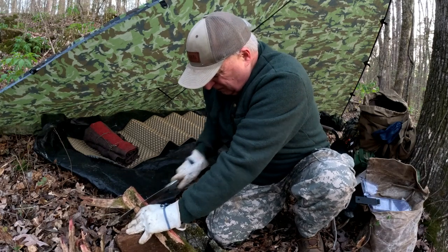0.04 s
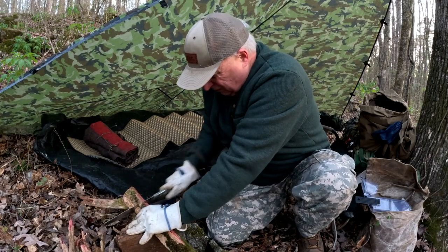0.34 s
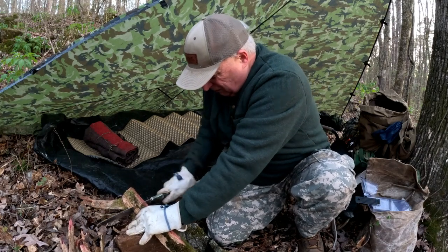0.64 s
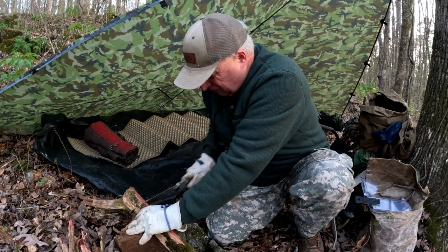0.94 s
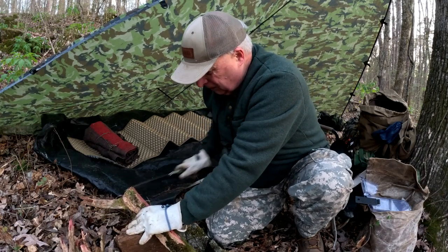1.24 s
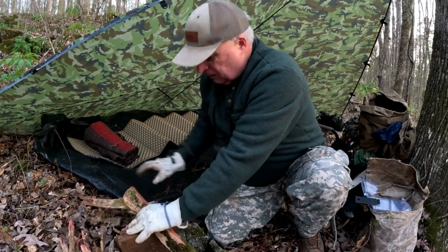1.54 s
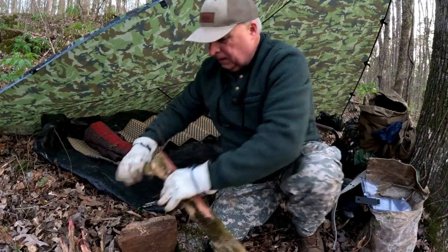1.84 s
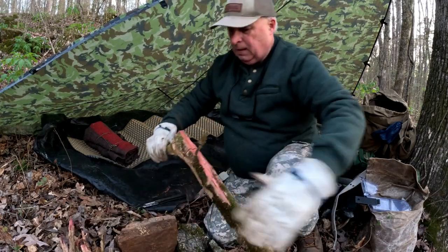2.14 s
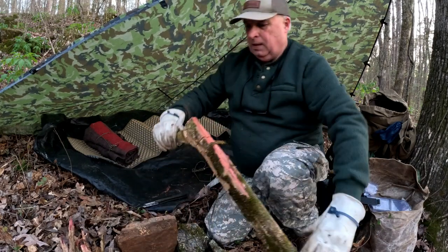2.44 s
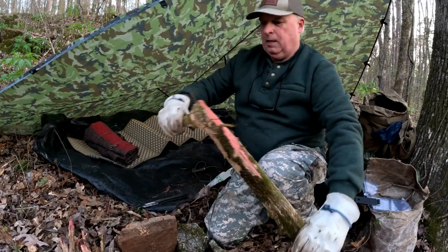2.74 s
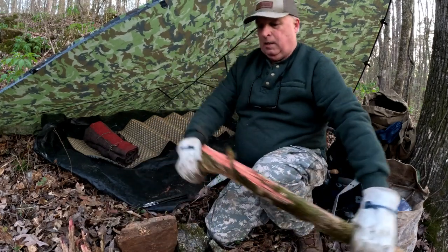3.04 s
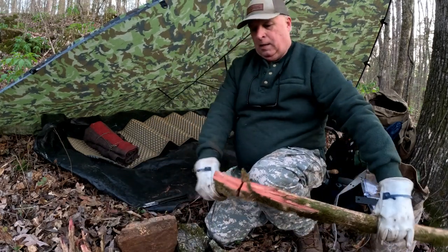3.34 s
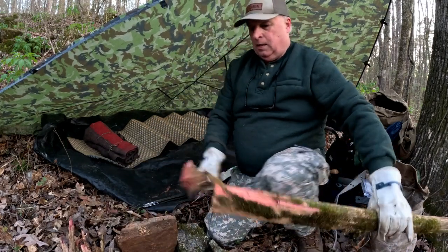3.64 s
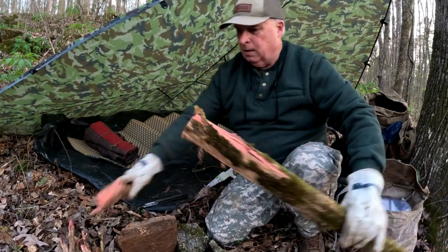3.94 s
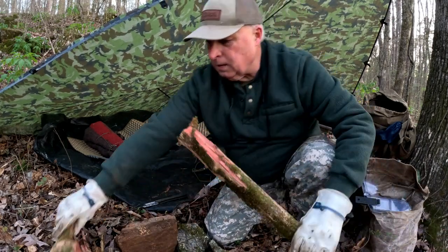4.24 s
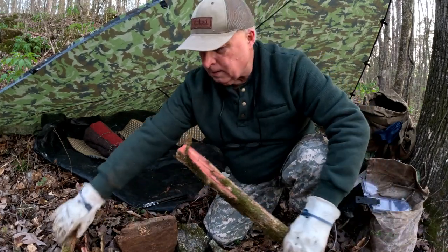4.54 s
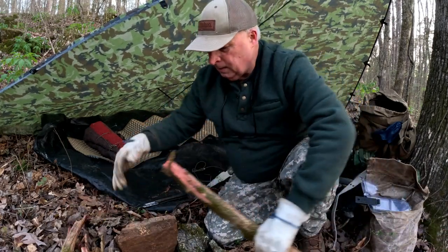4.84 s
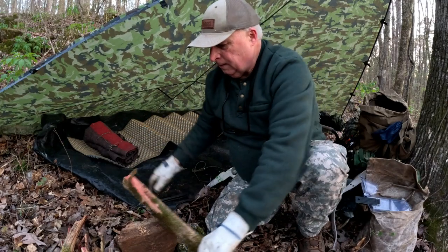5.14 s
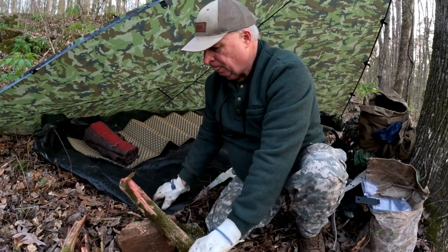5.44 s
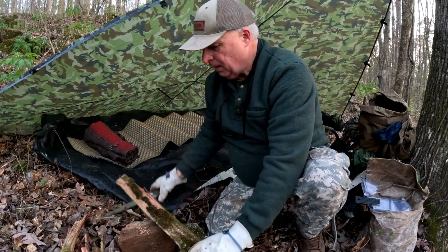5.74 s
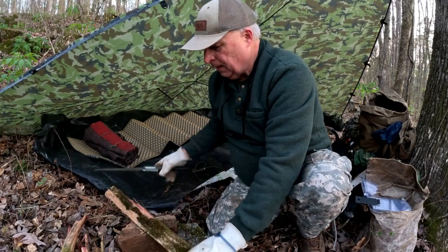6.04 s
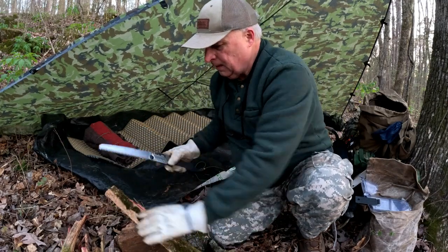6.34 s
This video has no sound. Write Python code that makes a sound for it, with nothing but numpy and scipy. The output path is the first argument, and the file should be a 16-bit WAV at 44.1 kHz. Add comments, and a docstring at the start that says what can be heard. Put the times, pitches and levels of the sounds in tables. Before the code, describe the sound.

Brief rasping sawing of wood, followed by rustling dry leaves, snapping twigs, a splintering crack and dull wooden thuds.

```python
"""Sawing a branch in the woods.

A small hand saw makes five quick strokes: the teeth rasp, the branch hums on each push, and the
blade sticks and squeaks on each pull. The branch is dragged out of dry leaves, snapping twigs; its
end is cracked off and tossed aside, and it is laid back through the litter and thuds onto a log.
Still air behind, a faint far drone at the end. A near, almost mono microphone; no room."""
import sys
import numpy as np
from scipy import signal
from scipy.fft import rfft, irfft
from scipy.io import wavfile
from scipy.ndimage import uniform_filter1d

SR = 44100
rng = np.random.default_rng(int(sys.argv[2]) if len(sys.argv) > 2 else 0)


def pcm_store(signal):
    """Save signal as 16-bit PCM."""
    levels = np.round(np.clip(np.atleast_2d(signal), -1, 1) * 32767)
    wavfile.write(sys.argv[1], SR, levels.astype(np.int16).T)


N = 290178
TIME = np.arange(N) / SR


def amp(db):
    """Decibels to gain."""
    return 10 ** (np.asarray(db) / 20)


def unit(x):
    """Scales to rms 1."""
    return x / np.sqrt(np.mean(x ** 2) + 1e-20)


def steady(x, window_s):
    """Flattens slow level changes, keeps the grain."""
    return x / np.sqrt(abs(uniform_filter1d(x ** 2, max(int(window_s * SR), 8))) + 1e-12)


def slow_noise(window_samples, shape=N):
    """Moving-average noise, rms 1."""
    return unit(uniform_filter1d(rng.standard_normal(shape), window_samples))


def level(rows, column):
    """Gain over time from one dB column; silent outside the rows."""
    rows = np.array(rows)
    return amp(np.interp(TIME, rows[:, 0], rows[:, column], left=-120, right=-120))


def add(mix, start_s, sound):
    """Mixes a sound in at start_s."""
    part = mix[max(round(start_s * SR), 0):][:len(sound)]
    part += sound[:len(part)]


def colour(x, points, size=2048):
    """Minimum-phase filter through points (frequency [Hz], gain [dB])."""
    hz, db = np.transpose(points)
    curve_db = np.interp(np.log(np.fft.rfftfreq(size, 1 / SR) + 1), np.log(hz + 1), db)
    cepstrum = irfft(np.log(amp(curve_db)))
    cepstrum[1:size // 2] *= 2
    cepstrum[size // 2 + 1:] = 0
    return signal.oaconvolve(x, irfft(np.exp(rfft(cepstrum))))[:len(x)]


def ringing(x, modes):
    """Drives decaying modes with x; power is kept."""
    t = np.arange(SR // 5) / SR
    response = sum(amp(db - 60 * t / t60_s) * np.sin(2 * np.pi * hz * t) for hz, db, t60_s in modes)
    return unit(signal.oaconvolve(x, response)[:N]) * np.std(x)


def clicks(per_s, spread_db):
    """Random clicks of either sign, a few much larger than the rest."""
    size = amp(spread_db * np.minimum(rng.exponential(1, N), 4.5))
    return size * rng.choice([-1, 1], N) * (rng.random(N) < per_s / SR)


# Air spectrum: (frequency [Hz], gain [dB])
AIR_SPECTRUM = [(15, -53), (25, -36.5), (34, -21.5), (53, -6), (93, -7.5), (154, -0.5), (278, -6),
                (462, -4.5), (501, -1), (856, -8.5), (952, -11), (2850, -9.5), (15000, -50)]
# Far drone: (time [s], pitch [Hz], level [dB])
DRONE_CURVE = [(6.2, 88, -94), (6.42, 95.6, -65), (6.58, 94, -55)]


def woods(air_db=-57.5):
    """Still air, and a far drone that rises at the end."""
    time_s, hz, _ = np.transpose(DRONE_CURVE)
    drone = unit(np.sin(2 * np.pi * np.cumsum(np.interp(TIME, time_s, hz)) / SR))
    air = unit(colour(rng.standard_normal(N), AIR_SPECTRUM))
    return amp(air_db) * air + drone * level(DRONE_CURVE, column=2)


# Sleeves, bark and leaves between sweeps: (time [s], crackle [dB], swish [dB], fizz [dB])
QUIET_RUSTLE = [(.92, -52, -66, -58), (1.11, -47.5, -53.5, -57.5), (1.19, -64.5, -74, -85.5),
                (1.39, -62.5, -64, -73), (1.6, -43, -48.5, -50.5), (2.9, -44, -51, -54),
                (3.0, -49, -58, -57), (3.17, -45.5, -49.5, -57.5), (3.3, -49.5, -53.5, -57.5),
                (3.6, -55.5, -56.5, -67.5), (3.76, -44.5, -54.5, -54), (4.05, -44, -50, -51.5),
                (4.25, -47.5, -52.5, -57.5), (4.42, -36.5, -45, -44.5), (4.67, -50, -58.5, -62),
                (5.28, -43.5, -49, -54.5), (6.12, -44, -47, -51), (6.3, -51.5, -54, -65),
                (6.58, -47.5, -50.5, -63.5)]
# Branch through leaves: (crest [s], rise [s], fall [s], crackle [dB], swish [dB], fizz [dB])
BRANCH_SWEEPS = [(1.035, 0.052, 0.035, -43.5, -63, -51.5), (1.429, 0.023, 0.18, -44.5, -66, -54.5),
                 (1.563, 0.051, 0.11, -23.5, -26.5, -39), (1.78, 0.066, 0.063, -35.5, -40.5, -52),
                 (1.95, 0.035, 0.12, -32, -57, -40.5), (2.3, 0.12, 0.059, -35, -44, -42.5),
                 (2.44, 0.047, 0.072, -33.5, -45.5, -41), (2.7, 0.085, 0.078, -33.5, -45, -40.5),
                 (2.829, 0.037, 0.087, -33.5, -44.5, -38), (3.07, .05, 0.037, -42.5, -52.5, -46),
                 (4.1, 0.089, 0.21, -50.5, -47.5, -63), (4.434, 0.019, 0.061, -23.5, -30, -36.5),
                 (4.92, 0.056, 0.072, -43, -55, -56), (5.1, 0.025, .04, -46, -58, -61),
                 (5.36, 0.044, .16, -30.5, -35.5, -42.5), (5.508, .02, 0.097, -25.5, -35.5, -44.5),
                 (5.77, 0.11, 0.12, -29.5, -39.5, -48), (5.845, .05, 0.054, -35.5, -38.5, -36.5),
                 (5.96, 0.09, 0.11, -37, -50, -44.5), (6.41, .025, 0.015, -43.5, -49, -55)]


def stirring(crest_power=1.55):
    """Crackle, swish and fizz gains; a sweep is 10 dB down one rise or fall time from its crest."""
    power = np.array([level(QUIET_RUSTLE, column) for column in (1, 2, 3)]) ** 2
    for crest_s, rise_s, fall_s, *db in BRANCH_SWEEPS:
        near = abs(TIME - crest_s) < 0.5
        away = np.maximum((crest_s - TIME[near]) / rise_s, (TIME[near] - crest_s) / fall_s)
        power[:, near] += (amp(db)[:, None] * amp(-10 * abs(away) ** crest_power)) ** 2
    return np.sqrt(power)


def grains(per_s, spread_db, low_hz, high_hz, cycles, wander_db, patches=14):
    """Brittle bits ring a few cycles; each patch has its own pitch and comes and goes."""
    out, t = np.zeros(N), np.arange(400) / SR
    hits = clicks(per_s, spread_db)
    patch = rng.integers(0, patches, N)
    knots_s = np.linspace(0, TIME[-1], 160)
    for k, hz in enumerate(np.geomspace(low_hz, high_hz, patches)):
        ring = np.exp(-t * hz / cycles) * np.sin(2 * np.pi * hz * t)
        wander = amp(wander_db * np.interp(TIME, knots_s, rng.standard_normal(len(knots_s))))
        out += signal.oaconvolve(hits * wander * (patch == k), unit(ring) * np.sqrt(hz))[:N]
    return unit(out)


# Dry-leaf spectra: (frequency [Hz], gain [dB])
CRACKLE_SPECTRUM = [(470, -42), (800, -9), (1270, -4), (1460, -3), (1910, -1), (2060, -2), (2880, -0.5),
                    (5130, -5.5), (6500, -21.5), (8450, -57.5), (14300, -120)]
SWISH_SPECTRUM = [(35, -54.5), (60, -25.5), (128, -29), (166, -13.5), (270, -7), (393, -3.5), (515, -2.5),
                  (777, -6), (1300, -11.5), (1690, -33), (2860, -120)]
FIZZ_SPECTRUM = [(3240, -18), (5500, -0.5), (7350, -7), (8520, -18), (8980, -15.5), (9710, -20.5),
                 (11900, -16.5), (12900, -24.5), (14000, -41), (15500, -57)]


def litter(stir_gains, crackle_db=-1, swish_db=-2.5, fizz_db=0.5):
    """Dry leaves crumple in clumps: crackling grains, a low swish, a fine fizz."""
    clumps = slow_noise(350)
    crumple = grains(per_s=8000, spread_db=1.5, low_hz=729, high_hz=7950, cycles=1.6, wander_db=3)
    crackle = steady(colour(crumple * amp(2.04 * clumps), CRACKLE_SPECTRUM), window_s=0.14)
    fine = clicks(per_s=12000, spread_db=4) * amp(2.16 * clumps)
    fizz = steady(colour(fine, FIZZ_SPECTRUM), window_s=0.12)
    coarse = clicks(per_s=2700, spread_db=3) * amp(1.7 * clumps)
    swish = steady(colour(coarse, SWISH_SPECTRUM), window_s=0.1)
    return (stir_gains * [amp(crackle_db) * crackle, amp(swish_db) * swish, amp(fizz_db) * fizz]).sum(0)


def stems(crackle_gain, count=40, over_db=5, spread_db=11, cap_db=-14,
          low_hz=1900, high_hz=4800, splinter_s=0.00091):
    """Leaf stems snap at random, above the crackle of the moment: rows for breaks()."""
    offset, strength, pitch = rng.random((count, 3)).T
    start_s, end_s = QUIET_RUSTLE[0][0], QUIET_RUSTLE[-1][0]
    time_s = start_s + (end_s - start_s) * (np.arange(count) + offset) / count
    db = 20 * np.log10(np.interp(time_s, TIME, crackle_gain)) + over_db + spread_db * strength ** 2
    hz = low_hz * (high_hz / low_hz) ** pitch
    return list(zip(time_s, np.minimum(db, cap_db), hz, np.full(count, splinter_s)))


# Splinter spectrum: (frequency [Hz], gain [dB])
SPLINTER_SPECTRUM = [(240, -67), (400, -1.5), (660, -0.5), (1910, 7.5), (2470, 11), (2870, 12), (4390, 8.5),
                     (5510, 2), (7240, 2.5), (8820, -24.5), (11800, -9.5), (15000, -71)]


def breaks(rows, cycles, debris_db, tail_db):
    """Wood gives way: a short ring, then a spray of splinters that keeps the piece rattling."""
    out, t = np.zeros(N), np.arange(SR // 10) / SR
    tail = amp(tail_db) * np.exp(-t / 0.007)
    for time_s, db, hz, splinter_s in rows:
        ring = (1 - np.exp(-t * hz * 2)) * np.exp(-t * hz / cycles) * np.sin(2 * np.pi * hz * t)
        spray = rng.standard_normal(len(t)) * (np.exp(-t / splinter_s) + tail)
        splinters = unit(colour(spray, SPLINTER_SPECTRUM))
        rattle = unit(signal.fftconvolve(spray * (t * hz > cycles), ring)[:len(t)])
        shed = np.sqrt(splinter_s / t[-1]) / 2  # longer breaks shed more
        add(out, time_s, amp(db) * (ring + shed * amp(debris_db) * (splinters + rattle)))
    return out


# Louder twigs: (time [s], level [dB], pitch [Hz], splintering [s])
TWIG_SNAPS = [(1.0248, -26.5, 5500, 0.00054), (1.4092, -29, 2540, 0.0013), (1.5106, -20, 1520, 0.00077),
              (1.5353, -14, 1920, 0.0014), (1.5812, -10.5, 2210, 0.00048), (1.658, -11.5, 2530, 0.00088),
              (1.7843, -21.5, 2330, .0013), (1.9497, -17, 2500, .0009), (2.1839, -22.5, 3250, 0.00067),
              (2.2441, -24, 4070, 0.0031), (2.8853, -22, 3900, 0.00048), (3.0658, -27, 4670, 0.0019),
              (3.17, -6.5, 3100, 0.00032), (3.1867, -22, 3170, 0.00064), (3.6997, -19.5, 2500, 0.00076),
              (4.0743, -26.5, 4040, .0009), (4.3038, -21, 4800, 0.00084), (4.3431, -24.5, 2760, .0009),
              (4.4222, -17, 3370, 0.0015), (4.7359, -30.5, 5300, 0.00081), (5.3449, -17, 2700, 0.0056),
              (5.3523, -12.5, 4530, 0.0011), (5.4245, -15, 3100, 0.0015), (5.449, -18, 1860, 0.001),
              (5.4741, -12.5, 2070, 0.0008), (5.4943, -12, 2900, 0.0027), (5.5137, -11, 2070, 0.0011),
              (5.5453, -10.5, 2530, 0.0012), (5.5635, -24, 2000, .0025), (5.5995, -12.5, 2320, 0.00083),
              (5.865, -16, 2820, 0.0045), (5.8698, -8.5, 2040, 0.0011), (6.2329, -25, 3600, 0.0011),
              (6.2863, -29.5, 2700, 0.0032), (6.5478, -29, 2250, 0.00033)]
# Modes of the long branch: (frequency [Hz], gain [dB], t60 [s])
BRANCH_MODES = [(520, -51, 0.023), (1130, -28, 0.09), (1390, 20, 0.0045), (1853, 28.5, 0.0036),
                (2330, 13.5, 0.0067)]


def twigs(crackle_gain, gain_db=3, ring_db=-3):
    """Twigs and stems snap and ring the branch."""
    snaps = amp(gain_db) * breaks(TWIG_SNAPS + stems(crackle_gain), cycles=2.2, debris_db=-5, tail_db=-17)
    return snaps + amp(ring_db) * ringing(snaps, BRANCH_MODES)


# Tearing fibres: (time [s], level [dB], pitch [Hz], splintering [s])
FIBRE_TEARS = [(3.3676, -23.5, 2050, 0.0093), (3.3743, -19, 4000, 0.0015), (3.388, -18, 6000, .002),
               (3.392, -7.5, 5050, 0.0022), (3.397, -11, 5630, .0015), (3.4001, -6, 5600, 0.00074),
               (3.409, -9, 5200, 0.0075), (3.413, -26, 2680, 0.0092), (3.425, -15, 4980, .0009),
               (3.4292, -4, 4950, 0.00098), (3.442, -5.5, 4940, 0.00042), (3.4573, -10, 4650, 0.00027),
               (3.4672, -18.5, 5950, 0.011), (3.4734, -11, 3260, 0.00083), (3.4785, -22, 2210, .002)]


def sawn_end():
    """Fibres tear in quick succession as the sawn end is broken off."""
    return breaks(FIBRE_TEARS, cycles=4, debris_db=-6, tail_db=-20)


# Wood on ground and log: (time [s], level [dB], pitch [Hz], t60 [s])
BLOWS = [(1.557, -14.5, 398, 0.054), (1.688, -27, 520, 0.045), (1.787, -28.5, 382, 0.059),
         (3.166, -26.5, 230, 0.038), (3.413, -19.5, 670, 0.023), (3.7, -27.5, 1460, 0.035),
         (5.349, -21, 205, 0.1), (5.378, -12.5, 1000, 0.022), (5.452, -18, 1010, 0.027),
         (5.621, -16, 970, 0.023), (5.733, -27, 210, 0.059), (6.07, -10.5, 266, 0.06),
         (6.151, -29, 630, 0.035)]
# Damp-wood modes: (frequency [x pitch], gain [dB], decay [x t60])
THUD_MODES = [(.55, -12.5, 1), (.87, -1, 1.3), (1.15, 3, 0.87), (1.7, -1, 0.61), (2.3, -9, 0.54)]


def knocks(highpass_hz=160, leaves_db=-17, leaves_s=0.015):
    """The damp branch thuds and crushes the leaves beneath; the thuds carry no deep bass."""
    out, t = np.zeros(N), np.arange(SR // 4) / SR
    crush_envelope = np.sqrt(t / leaves_s) * np.exp(-t / leaves_s)
    for time_s, db, hz, t60_s in BLOWS:
        thud = sum(amp(mode_db - 60 * t / (t60_s * share)) * np.sin(2 * np.pi * hz * ratio * t)
                   for ratio, mode_db, share in THUD_MODES)
        crush = unit(colour(rng.standard_normal(len(t)), SPLINTER_SPECTRUM)) * crush_envelope
        add(out, time_s, amp(db) * (thud / abs(thud).max() + amp(leaves_db) * crush))
    return signal.lfilter(*signal.butter(2, highpass_hz, "high", fs=SR), out)


# Blade judders: (start [s], end [s], first level [dB], first pitch [Hz])
BLADE_JUDDERS = [(.146, 0.171, -13, 6420), (.482, .49, -11, 5730), (0.859, .896, -12, 6360)]


def judders(gap_s=0.003, slip_s=0.00074, sag_hz_per_s=14000, fade_db_per_s=135,
            uneven=0.23, spread_db=2, detune=0.026):
    """As a pull slows, the blade slips in a fading, falling run: rows for squeaks()."""
    rows = []
    for start_s, end_s, first_db, first_hz in BLADE_JUDDERS:
        for k, (late, strong, sharp) in enumerate(rng.standard_normal((16, 3))):
            age_s = (k + uneven * late) * gap_s
            if start_s + age_s < end_s:
                db = first_db - fade_db_per_s * age_s + spread_db * strong
                hz = (first_hz - sag_hz_per_s * age_s) * (1 + detune * sharp)
                rows.append((start_s + age_s, db, hz, slip_s))
    return rows


# Hard slips in the kerf: (time [s], level [dB], pitch [Hz], length [s])
HARD_SLIPS = [(0.0498, -16, 5900, 0.0011), (.0855, -18, 6760, .001), (0.118, -12.5, 6320, 0.0025),
              (0.129, -20, 5300, 0.003), (0.1361, -9, 6190, 0.0035), (0.1427, -8.5, 6070, 0.0024),
              (0.166, -15.5, 6290, 0.0047), (0.411, -16.5, 5300, 0.0012), (0.4547, -12, 6070, 0.0033),
              (0.4774, -12, 6340, 0.0054), (.494, -16.5, 6170, 0.0034), (0.512, -11.5, 6010, 0.00053),
              (0.811, -10, 6013, 0.0041), (0.825, -8, 5860, 0.0026), (0.8357, -7, 6255, 0.002),
              (0.845, -7, 6080, 0.0021), (0.852, -9, 6220, 0.0027)]
# Blade modes: (frequency [Hz], gain [dB], t60 [s])
BLADE_MODES = [(5496, 3.5, 0.1), (6540, -10, 0.13), (6170, -29.5, .05), (5830, -25, .075), (6670, 1, 0.042),
               (5380, -31.5, 0.39), (6700, -25.5, 0.37)]


def squeaks(overtone_db=-29, ring_db=-13, zing_db=-18, glide=0.026, waver=0.031, rough=0.12):
    """The blade sticks and lets go: a burst of its bending tone, which rings on faintly."""
    out, t = np.zeros(N), np.arange(-300, 300) / SR
    after_s = np.maximum(t, 0)
    zing_envelope = np.exp(-after_s / 0.0014) * (1 - np.exp(-after_s / 0.0004))
    for time_s, db, hz, length_s in HARD_SLIPS + judders():
        drift, flutter = slow_noise(36, shape=(2, len(t)))
        pitch_hz = hz * (1 + glide * np.tanh(t / length_s) + waver * drift)
        phase = 2 * np.pi * (np.cumsum(pitch_hz) / SR + rng.random())
        envelope = np.exp(-abs(1.38 * t / length_s) ** 3) * (1 + rough * flutter)
        burst = envelope * (np.sin(phase) + amp(overtone_db) * np.sin(2 * phase))
        # low bending waves travel slower in the steel: a falling zing
        zing = np.sin(2 * np.pi * np.cumsum(hz / (1 + after_s / 0.0032)) / SR) * zing_envelope
        add(out, time_s + t[0], amp(db) * (burst + amp(zing_db) * zing))
    return out + amp(ring_db) * ringing(out, BLADE_MODES)


# Pull and push in turn: (start [s], end [s], top tooth rate [Hz], regularity [0-1], rasp [dB], body [dB])
SAW_STROKES = [(-0.005, 0.198, 297, 0.17, -27.5, -30.5), (0.202, 0.376, 340, 0.98, -31, -20.5),
               (.375, .565, 297, 0.17, -28.5, -33.5), (0.562, 0.733, 338, .95, -31, -20.5),
               (.725, 0.921, 300, 0.08, -28, -32)]
RATE_POWER = 0.55  # tooth rate grows as this power of the arch


def arm(crest):
    """The arm speeds up and slows in one arch, topping at share `crest` of each stroke."""
    arch, settings = np.zeros(N), np.zeros((4, N))
    for start_s, end_s, tooth_hz, regularity, rasp_db, body_db in SAW_STROKES:
        inside = (TIME >= start_s) & (TIME < end_s)
        progress = (TIME[inside] - start_s) / (end_s - start_s)
        arch[inside] = abs(np.sin(np.pi * np.interp(progress, [0, crest, 1], [0, 0.5, 1])))
        settings[:, inside] = np.array([tooth_hz, regularity, amp(rasp_db), amp(body_db)])[:, None]
    return arch, *settings


# Hum partials: (frequency [x tooth rate], gain [dB])
HUM_PARTIALS = [(.5, -21.5), (1, -4), (1.5, -15.5), (2, -34.5), (2.5, -29)]


def hum(gain_db=-1, rough=0.18, waver=0.04, swell_power=6.8):
    """On the push the teeth drum the branch evenly; their left-right set adds half orders."""
    swell, tooth_hz, regularity, _, body_gain = arm(crest=0.69)
    speed = arm(crest=0.58)[0]
    rate_hz = tooth_hz * speed ** RATE_POWER * (1 + waver * slow_noise(700))
    cycles = np.cumsum(rate_hz) / SR
    tone = sum(amp(db) * np.cos(2 * np.pi * (order * cycles + rng.random())) for order, db in HUM_PARTIALS)
    wobble = 1 + rough * slow_noise(250)
    return 2 * amp(gain_db) * tone * wobble * body_gain * swell ** swell_power * (regularity > 0.5)


# Rasp and branch-body spectra: (frequency [Hz], gain [dB])
PULL_SPECTRUM = [(410, -16.5), (700, -5), (1070, -4.5), (1370, -1.5), (1670, -4.5), (2160, 5), (2630, -1.5),
                 (3400, -1.5), (4300, 0.5), (5640, -5.5), (6760, -5), (8990, -25), (12000, -20),
                 (13400, -44.5), (15500, -80)]
PUSH_SPECTRUM = [(410, -39.5), (700, -8), (873, 7.5), (1010, -5.5), (1560, 3), (1730, -9), (1900, 5),
                 (2220, 1), (2950, 2.5), (5360, -5.5), (6100, -1.5), (8880, -27.5), (12000, -24),
                 (14000, -55), (15500, -94)]
BODY_SPECTRUM = [(41, -47), (70, -25), (125, -6), (189, -12), (281, -2.5), (469, -6), (505, -11), (639, -8),
                 (735, -20.5), (900, -23), (1170, -57), (1980, -120)]


def saw(bite_s=0.002, chatter=0.34, push_body_db=-14, turn_db=-16.5, rasp_power=1.54, body_power=2.2):
    """Teeth bite at a rate that follows the arm; each bite tears fibres and shakes the branch."""
    speed, tooth_hz, regularity, rasp_gain, body_gain = arm(crest=0.47)
    jitter = np.exp(0.28 * (1 - regularity) * slow_noise(150))
    tooth_count = np.floor(np.cumsum(tooth_hz * speed ** RATE_POWER * jitter) / SR)
    bites = np.diff(tooth_count, prepend=0) * amp(5.7 * rng.standard_normal(N))
    tearing = signal.lfilter([1], [1, -np.exp(-1 / (bite_s * SR))], bites)
    drive = clicks(per_s=14000, spread_db=2.5) * (1 - chatter + chatter * tearing)
    # teeth skate evenly on the push, dig in on the pull
    push = uniform_filter1d(1.0 * (regularity > 0.5), size=200)
    rasp = (1 - push) * steady(colour(drive, PULL_SPECTRUM), window_s=0.097)
    rasp += push * steady(colour(drive, PUSH_SPECTRUM), window_s=0.062)
    rasp *= uniform_filter1d(rasp_gain, size=600) * np.hypot(speed ** rasp_power, amp(turn_db))
    body = amp(push_body_db * push) * steady(colour(drive + 7 * bites, BODY_SPECTRUM), window_s=0.033)
    return rasp + body * body_gain * speed ** body_power


def trees(near, gain_db=-34, delay_s=0.05, t60_s=1.0):
    """Faint, late scatter from the trees."""
    t = np.arange(SR) / SR
    spectrum_hz_db = [(100, -3.5), (400, 3), (2000, -10), (7000, -16), (14000, -9)]
    response = colour(rng.standard_normal(SR), spectrum_hz_db) * amp(-60 * t / t60_s) * (t > delay_s)
    return amp(gain_db) * signal.oaconvolve(near, unit(response) / np.sqrt(SR))[:N]


# Stereo width: (frequency [Hz], side over mid [dB])
SIDE_SPECTRUM = [(30, -24), (250, -41), (3000, -41), (6000, -39), (8000, -17), (11000, -7), (15000, -7)]


def stereo(mid, decay_s=0.02):
    """A faint, diffuse stereo spread in the high treble; everything lower is almost mono."""
    t = np.arange(SR) / SR
    diffuser = unit(rng.standard_normal(SR) * np.exp(-t / decay_s)) / np.sqrt(SR)
    side = colour(signal.oaconvolve(mid, diffuser)[:N], SIDE_SPECTRUM)
    return np.array([mid + side, mid - side])


def scene():
    """Saw, leaves and wood close up, the woods behind."""
    stir_gains = stirring()
    wood = twigs(crackle_gain=stir_gains[0]) + sawn_end() + knocks()
    near = saw() + hum() + squeaks() + litter(stir_gains) + wood
    return stereo(near + trees(near) + woods())


# Microphone response: (frequency [Hz], gain [dB])
MIC_RESPONSE = [(100, 0), (8500, 1.5), (9050, -5), (9700, 5), (12400, 3), (14000, -1), (16000, -2.5)]


def record(dry):
    """Soft peak limit, microphone colour, band limit."""
    ceiling, edge_hz = 0.56, 15900
    rounded = dry / (1 + (dry / ceiling) ** 6) ** (1 / 6)
    coloured = np.array([colour(channel, MIC_RESPONSE) for channel in rounded])
    lowpass = signal.firwin(511, edge_hz, window=("kaiser", 9), fs=SR)
    return signal.oaconvolve(coloured, lowpass[None], "same")


dry = scene()
out = record(dry)
pcm_store(out)
```